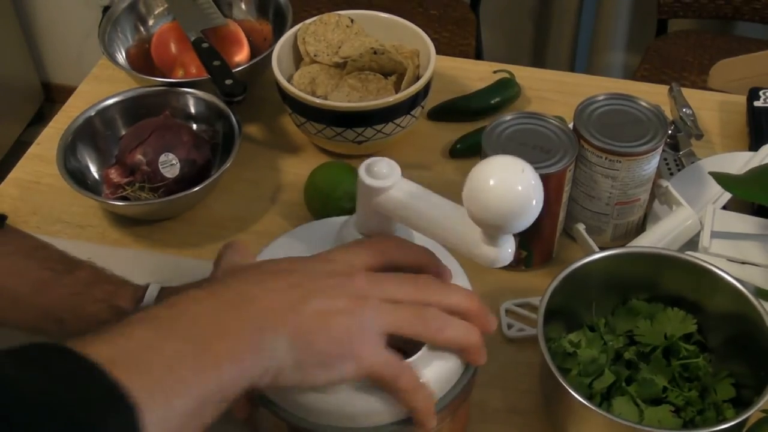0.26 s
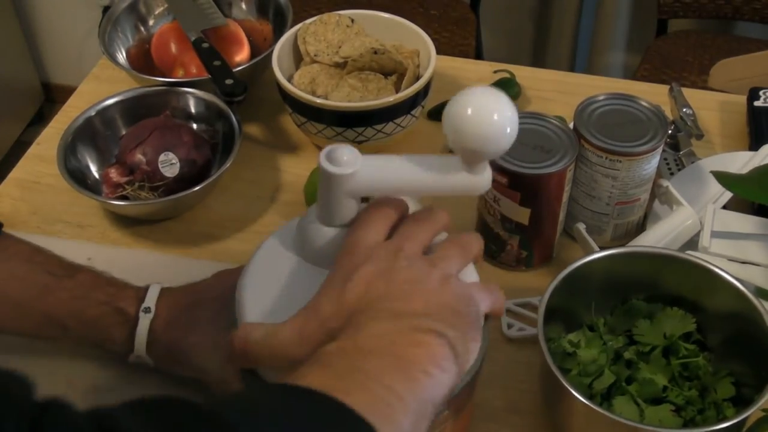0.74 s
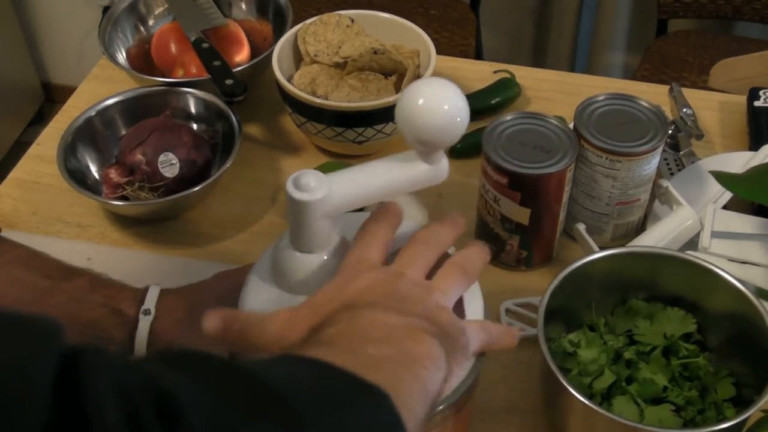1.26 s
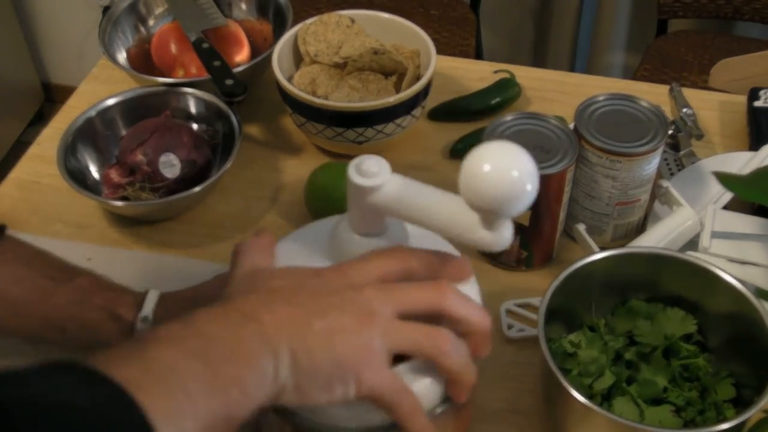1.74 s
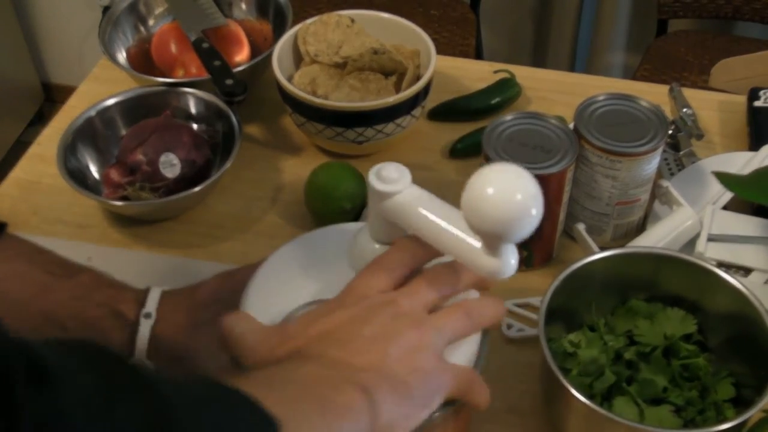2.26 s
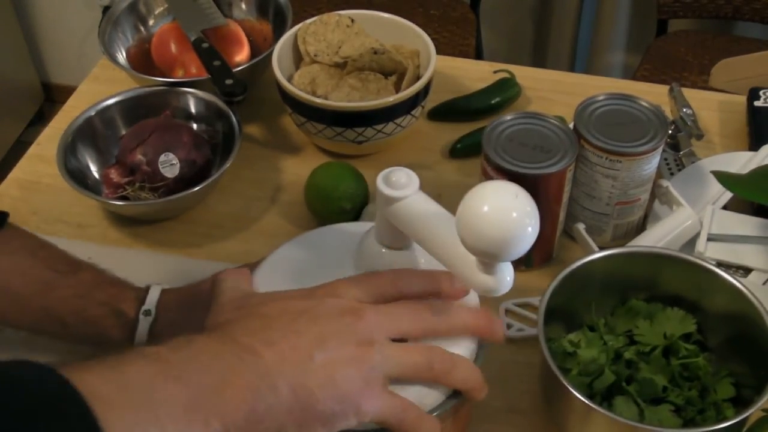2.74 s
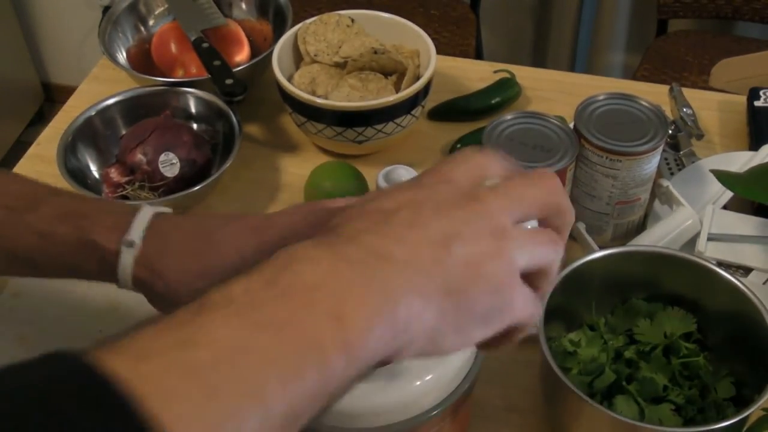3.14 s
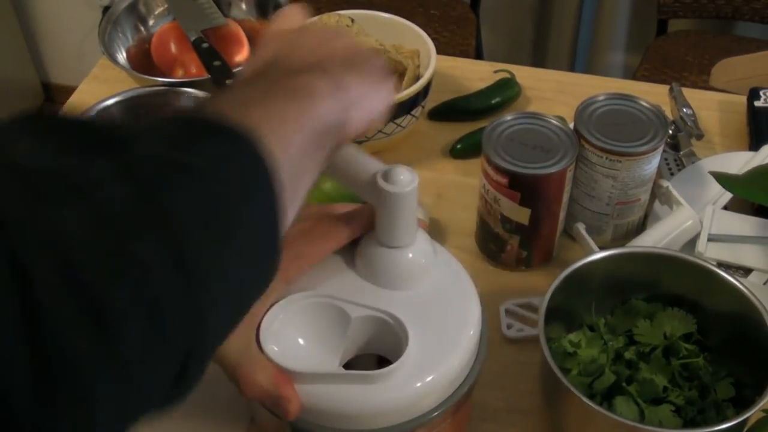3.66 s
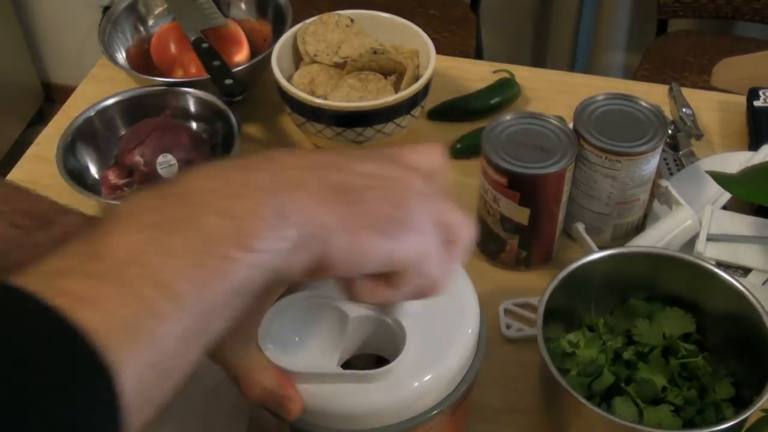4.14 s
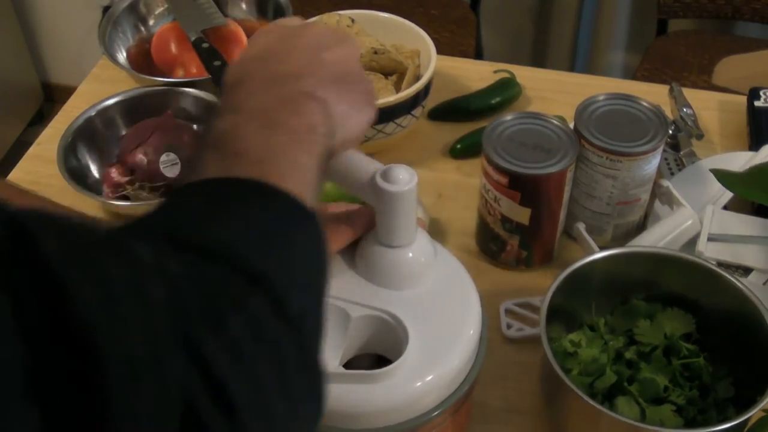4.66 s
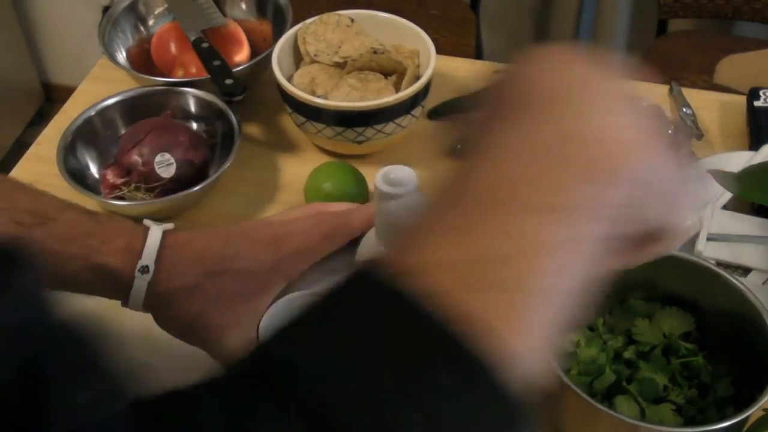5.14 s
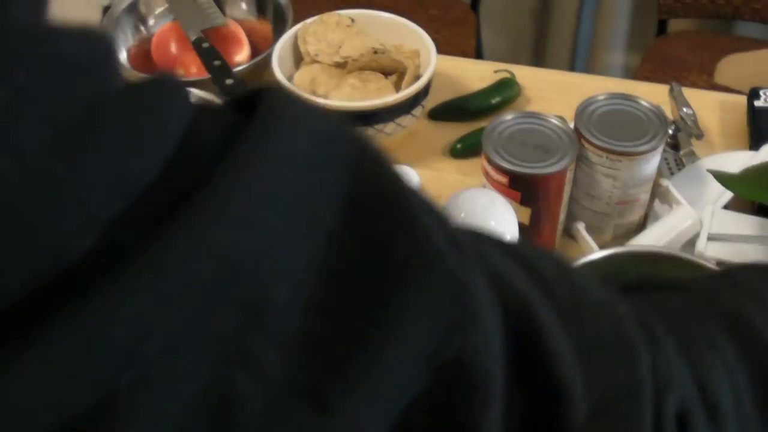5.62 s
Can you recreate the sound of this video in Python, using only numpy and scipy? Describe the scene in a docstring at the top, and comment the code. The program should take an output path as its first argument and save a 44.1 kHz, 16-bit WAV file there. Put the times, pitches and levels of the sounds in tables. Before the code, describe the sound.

Hollow plastic clacks and rubbing as a lid is forced onto a food chopper, followed by dull, uneven crank grinding in a small kitchen.

```python
"""A hand presses and twists the lid of a plastic food chopper until it snaps on: knocks ring lid, bowl
and small stiff parts, and rubbing rings them through many tiny catches, with hiss and a few squeaks.
Then the hand turns the crank: gears and blade grind, and the blade catches and jolts in soft thumps.
Faint echoes of a small kitchen follow every sound of the chopper, over steady quiet air noise."""
import sys
import numpy as np
from scipy import signal
from scipy.fft import rfft, irfft, next_fast_len
from scipy.io import wavfile
from scipy.ndimage import uniform_filter1d

SR = 44100
rng = np.random.default_rng(int(sys.argv[2]) if len(sys.argv) > 2 else 0)


def dump_mix(stems):
    """Bounce the given channels to the path in sys.argv[1] as a 16-bit WAV at rate SR."""
    frames = np.atleast_2d(stems).T  # one column per channel
    limited = np.clip(frames, -1, 1)  # hard clip at full scale
    pcm = np.round(limited * 32767).astype(np.int16)
    wavfile.write(sys.argv[1], SR, pcm)


N = 259749
LEAD_S = 0.005  # a blow starts this long before its peak

# Modes of the hollow bowl, before detuning and damping.
# Each row: frequency in Hz, relative level in dB, 60 dB decay time in seconds.
BOWL_MODES = [(213.7, -29, 0.13), (296, -39.5, .1), (371.6, -2, 0.26), (419.6, 2.5, 0.16), (473, 2, 0.11),
              (508.1, -3.5, 0.26), (553.4, 4, 0.088), (632, 0.5, 0.12)]
# Modes of the thin lid, before detuning and damping.
# Each row: frequency in Hz, relative level in dB, 60 dB decay time in seconds.
LID_MODES = [(839, 7, 0.032), (927, 6.5, 0.016), (1070, -1, 0.096), (1260, 7, 0.039), (1490, -0.5, 0.068),
             (1646, -0.5, 0.029), (1795, -11, 0.042), (2095, -14.5, 0.11)]
# Modes of small stiff parts, before detuning and damping.
# Each row: frequency in Hz, relative level in dB, 60 dB decay time in seconds.
RIM_MODES = [(2983, -2.5, .04), (3656, -6.5, 0.052), (4713, -1.5, 0.061), (5037, 3.5, 0.017),
             (5650, -13, 0.076)]


def knock(lid_db, bowl_db, crack_db, snap_db, lid_hz, bowl_hz, contact_ms, rise_ms, damp):
    """Impact excitation: a brief contact force, convolved with modal responses, plus a noisy crack and snap."""
    # Spectrum of the crack. Each row: frequency in Hz, relative density in dB per Hz.
    crack_spectrum = [(880, -17), (1500, 1.5), (2220, -1), (2420, -8), (3210, -4.5), (3540, -6),
                      (5280, -10), (5670, -12), (6990, -24), (13800, -26.5), (16400, -44.5)]
    t = np.arange(6144) / SR - LEAD_S
    contact_ms = max(contact_ms, 0.3)
    force = np.exp(np.minimum(t / 0.00011, -t * 1000 / contact_ms))
    # a sharp first contact and a short rattle
    rattle = rng.standard_normal(len(t)) * (force + 2.7 * np.exp(-abs(t) / 0.00022))
    # the wall yields at its own pace
    yielding = np.exp(1000 * np.minimum(t / max(rise_ms, 0.05), -t / contact_ms))
    push = np.cos(2 * np.pi * bowl_hz * t) * yielding

    lid_response = ring(LID_MODES, lid_hz, spread=0.25, detune=0.061, damp=0.58)
    lid = signal.fftconvolve(rattle, lid_response)[:len(t)]
    # the lid's ring is kept out of the bass
    lid = signal.sosfilt(signal.butter(2, 500.0, "high", fs=SR, output="sos"), lid)
    bowl_response = ring(BOWL_MODES, bowl_hz, spread=0.2, detune=0.023, damp=damp)
    bowl = signal.fftconvolve(push, bowl_response)[:len(t)]
    rim = signal.fftconvolve(rattle, ring(RIM_MODES, 4530.0, detune=0.046))[:len(t)]

    noise = pair(crack_spectrum, len(t))
    dull = signal.sosfiltfilt(signal.butter(4, 6800.0, fs=SR, output="sos"), noise)
    shiver = 0.23 * np.exp(-abs(t) / 0.021) * (t > 0)  # loose parts shiver on
    crack = dull * (force + shiver) + 1.36 * rim / abs(rim).max()
    snap = evened(noise - dull) * (force + 0.027 * np.exp(-abs(t) / 0.006) * (t > 0))
    rings = amp(lid_db) * lid / abs(lid).max() + amp(bowl_db + 1.5) * bowl / abs(bowl).max()
    return rings + amp(crack_db + 5.5) * crack + amp(snap_db - 0.5) * snap


def lid_knocks(mix):
    """Impacts of hand and lid on the bowl; damping by the grip shortens the bowl's modal decay."""
    # Each row: peak time in seconds, lid ring, bowl thump and crack in dB, snap in dB against the crack,
    # lid and bowl emphasis in Hz; levels are before the layer trims in knock().
    knocks = [(0.054, -15, -21, -33.5, -23, 1060, 390), (0.219, -10, -14.5, -21.5, -10, 1300, 429),
              (0.315, -24, -38.5, -41, -7, 1260, 396), (0.436, -40, -35.5, -47.5, 1, 834, 514),
              (0.781, -16.5, -21.5, -38.5, -23, 746, 522), (0.812, -25.5, -24.5, -42.5, -17.5, 805, 557),
              (0.834, -2.5, -26.5, -33, -10.5, 1540, 550), (0.838, -2.5, -16.5, -50, 0, 1270, 382),
              (0.862, -25.5, -16, -28.5, -6, 1430, 540), (0.912, -6, -5, -17.5, -5, 1260, 500),
              (0.982, -21.5, -5, -22, -2, 1433, 520), (1.263, -19.5, -12, -27, 3.5, 970, 461),
              (1.467, -38, -26.5, -41, -7.5, 2160, 395), (1.48, -12, -17.5, -55, 0.5, 1070, 375),
              (1.493, -11, -29, -28, -22.5, 1120, 352), (1.715, -6, -8.5, -17, -2, 1490, 432),
              (1.749, -16.5, -14.5, -63, 3, 1490, 516), (1.795, -33, -24, -36, -0.5, 1700, 480),
              (1.823, -20.5, -35, -34.5, -10, 1510, 550), (1.836, -34, -48, -28.5, -16.5, 1190, 354),
              (1.955, -17.5, -19.5, -34, -14, 880, 473), (1.98, -8.5, -11, -20, -4.5, 1080, 418),
              (2.026, -23, -10.5, -26, -19, 1170, 387), (2.301, -24.5, -25, -37, -6.5, 1280, 380),
              (2.751, -34.5, -46.5, -47, 6.5, 894, 405), (2.883, -51, -42.5, -46, 6.5, 1640, 380),
              (3.083, -22.5, -47, -37.5, -24, 1710, 356), (3.098, -21, -28, -63, 9, 1180, 443),
              (3.146, -46, -36, -54, -22, 1180, 368), (5.404, -42, -37.5, -63, -7, 1490, 443)]
    for s, lid_db, bowl_db, crack_db, snap_db, lid_hz, bowl_hz in knocks:
        blow = knock(lid_db, bowl_db, crack_db, crack_db + snap_db, lid_hz, bowl_hz,
                     contact_ms=3.3, rise_ms=0.36, damp=0.65)
        add(mix, s - LEAD_S, blow)


def crank_jolts(mix):
    """Impacts of the catching blade: a slow rise of force favours the low modes."""
    # Each row: peak time in seconds, bowl thump and crack in dB, before the layer trims in knock().
    jolts = [(3.29, -26, -55), (3.335, -25, -52), (3.356, -36, -61), (3.442, -35, -38.5), (3.585, -20, -62),
             (3.648, -17.5, -54), (3.66, -24, -42), (3.702, -20.5, -44), (3.741, -21.5, -61),
             (3.801, -28.5, -40), (3.838, -23, -54), (4.025, -22.5, -44), (4.102, -25.5, -46),
             (4.293, -30.5, -62), (4.371, -39, -40), (4.389, -24.5, -47), (4.436, -33, -58),
             (4.503, -34.5, -46.5), (4.563, -33, -44), (4.649, -28.5, -57), (4.678, -20, -52),
             (4.715, -21.5, -52), (4.757, -24.5, -45), (4.857, -25, -61), (4.946, -22.5, -49),
             (4.982, -48, -42), (5.0, -26, -50), (5.074, -33, -48.5), (5.11, -35.5, -66)]
    for s, bowl_db, crack_db in jolts:
        blow = knock(bowl_db - 6.5, bowl_db, crack_db, crack_db + 1.5, lid_hz=1440, bowl_hz=380,
                     contact_ms=3.8, rise_ms=3.6, damp=0.52)
        add(mix, s - LEAD_S, blow)


def rubbing():
    """Stick-slip friction: random catches excite the modes, while sliding surfaces hiss and the counter murmurs."""
    # A loose lid raises the hollow note. Each row: time in seconds, looseness from 0 to 1.
    looseness = [(0, 0.5), (.4, 0.3), (.76, 1), (1.15, 1), (1.35, 0.83), (1.5, 0.45), (1.75, 0.1),
                 (1.8, .6), (2.0, 0.23), (3.2, 0.21), (5.89, 0.28)]
    # Spectrum of the sliding noise. Each row: frequency in Hz, relative density in dB per Hz.
    hiss_spectrum = [(880, -16), (1500, -6), (2400, -9), (3840, -10), (4830, -13), (6140, -13.5),
                     (7350, -26.5), (10200, -25.5), (13700, -28.5), (15400, -28.5), (16400, -36.5)]
    # Spectrum of the counter under the bowl. Each row: frequency in Hz, relative density in dB per Hz.
    thud_spectrum = [(20, -31.5), (60, -15), (120, -22.5), (170, -2), (205, 7.5), (260, -21), (400, -45.5)]
    # Faint hum in the counter. Each row: time in seconds, level in dB.
    murmur = [(0, -69), (2.35, -61), (2.6, -65), (2.95, -73.5), (3.6, -51), (5.1, -62.5), (5.5, -85)]
    bowl_db, lid_db, hiss_db, sizzle_db = contact()
    loose = np.clip(follow(looseness)[0], 0, 1)
    clumps = amp(1.8 * wander(500))

    lid_catches = slips(per_s=1500.0, spread_db=1.0, clumps=clumps)
    bowl_catches = slips(per_s=600.0, spread_db=2.5, clumps=clumps)
    grit = slips(per_s=900.0, spread_db=4.5, clumps=clumps)
    shut, ajar = (rung(bowl_catches, BOWL_MODES, centre_hz=hz, spread=0.38, detune=0.035, damp=1.0)
                  for hz in (370.0, 520.0))
    bowl = np.sqrt(1 - loose) * shut + np.sqrt(loose) * ajar
    lid = rung(lid_catches, LID_MODES, centre_hz=1600.0, spread=1.5, detune=0.06)
    crunch = rung(grit, RIM_MODES, count=8, centre_hz=4500.0, detune=0.091)

    # the hiss swells with the clumps and flickers with the catches
    fading = np.exp(-np.arange(900) / SR / 0.0072)
    flicker = evened(signal.fftconvolve(abs(lid_catches), fading)[:N])
    noise = evened(steady(hiss_spectrum) * (0.23 + 0.7 * clumps + 0.13 * flicker))
    dull = signal.sosfiltfilt(signal.butter(4, 6900.0, fs=SR, output="sos"), noise)
    patches = amp(2.1 * wander(700))  # the sizzle of the rubbing comes in random patches
    sizzle = evened(patches * (noise - dull))
    hiss = amp(hiss_db) * (dull + 0.55 * crunch) + amp(sizzle_db + 1.5) * sizzle

    # the counter follows the bowl and adds its own hum
    thud_gain = amp(0.57 * bowl_db - 39.0) + amp(follow(murmur)[0])
    return amp(bowl_db - 6.0) * bowl + amp(lid_db - 3.0) * lid + hiss + thud_gain * steady(thud_spectrum)


def contact():
    """Powers of independent contacts add: strokes press, hold and let go; the crank follows its load.

    Returns levels in dB of bowl, lid, hiss and sizzle, before the layer trims in rubbing()."""
    # Pushes and twists of the lid. Each row: time of full pressure in seconds, hold in seconds,
    # pressure in dB, then lid, hiss and sizzle in dB against it.
    strokes = [(0.0, 0.059, -26, -11.5, -17, -25), (0.223, .02, -30.5, -5.5, -5, -16),
               (0.278, .05, -30, -8.5, -9.5, -19), (0.44, .01, -34.5, -11, -15, -22),
               (0.488, .04, -38, -11, -10, -17), (.56, .03, -45, -10, -10.5, -14.5),
               (0.659, 0.033, -38.5, -5, -10.5, -22), (0.802, 0.14, -25.5, 0.5, -14.5, -31),
               (0.909, 0.028, -8.5, -11, -22, -31.5), (0.989, 0.023, -17.5, -14.5, -17, -30.5),
               (1.26, .03, -24.5, -26, -16.5, -19.5), (1.358, 0.032, -34, -11.5, -12.5, -21),
               (1.475, 0.064, -27.5, -6.5, -14, -23.5), (1.54, .01, -35.5, -0.5, -12, -14),
               (1.61, 0.011, -32.5, -20, -15, -23), (1.714, 0.005, -18.5, -5, -8.5, -18),
               (1.829, 0.034, -26.5, 1.5, -8.5, -26.5), (1.968, 0.053, -20, -4, -13.5, -24),
               (2.13, 0.0067, -37, -2.5, -6, -14.5), (2.202, 0.025, -40, -4.5, -4.5, -14),
               (2.268, 0.059, -35.5, -10, -13, -19.5), (2.438, 0.0043, -50, 0.5, -6, -12),
               (2.542, .01, -53.5, 1.5, -1.5, -18), (2.642, 0.03, -54.5, 2, 0.5, -4),
               (2.75, 0.026, -53.5, -1, -0.5, -2), (2.829, 0.038, -45, -4, -6.5, -8.5),
               (2.93, 0.014, -46, -10, -11.5, -15), (3.077, .04, -36, -2.5, -14, -28),
               (3.148, .03, -37.5, -4, -15.5, -33), (3.21, 0.028, -48.5, -11, -12, -20),
               (5.328, 0.088, -52.5, -5.5, -8, -10), (5.42, 0.014, -48, -3, -9.5, -21)]
    # Load on the crank. Each row: time in seconds, grind in dB, then lid, hiss and sizzle in dB against it.
    crank = [(3.25, -36, -1, -12.5, -18.5), (3.33, -32.5, -6, -14, -18), (3.45, -38.5, 0.5, -8.5, -11),
             (3.6, -24, -12, -19, -24), (3.63, -37, -5, -7, -17), (3.65, -21, -11, -16.5, -25.5),
             (3.8, -33.5, -4, -12, -20.5), (3.84, -24, -7.5, -18, -22.5), (3.9, -38.5, -4, -9, -16),
             (4.05, -29.5, -5, -17.5, -23), (4.27, -48, -8.5, -8.5, -15), (4.3, -37, -16, -16, -23),
             (4.37, -46.5, 7.5, 1.5, -5), (4.39, -25, -9, -13.5, -17), (4.44, -38, -10.5, -17, -23.5),
             (4.61, -41.5, 0, -10.5, -14), (4.68, -26.5, -3, -15, -24), (4.84, -36, -4, -12, -19.5),
             (4.96, -30.5, -6, -16, -28), (4.98, -39, 0, -2.5, -18), (5.01, -28.5, -15, -19, -28),
             (5.03, -45.5, -6, -11, -15), (5.11, -37.5, -9.5, -20, -30), (5.27, -78, -5, 7, 7)]
    # Release rate in dB per second, one row each for bowl, lid, hiss and sizzle.
    release_db_per_s = np.c_[[200, 230, 240, 300]]
    press_db_per_s = 595.5  # also fades the crank in and out
    t = np.arange(0, N, 64) / SR
    s, *load = np.transpose(crank)
    grind_db, *layers_db = (np.interp(t, s, c) for c in load)
    idle_db = press_db_per_s * np.maximum(np.maximum(s[0] - t, t - s[-1]), 0)
    power = amp(grind_db - idle_db + np.array([0 * t, *layers_db])) ** 2
    for full, held, db, *against_db in strokes:
        press_db = press_db_per_s * np.maximum(full - t, 0)
        release_db = release_db_per_s * np.maximum(t - full - held, 0)
        power = power + amp(db - press_db - release_db + np.c_[[0, *against_db]]) ** 2
    return follow(np.column_stack([t, *(10 * np.log10(power + 1e-12))]))


def slips(per_s, spread_db, clumps):
    """Random point process: tiny catches of random sign, scaled in clumps; a few are large."""
    size = amp(spread_db * np.minimum(rng.exponential(1, N), 4)) * rng.choice([-1, 1], N)
    return size * clumps * (rng.random(N) < per_s / SR)


def rung(catches, modes, count=5, **shape):
    """Modal excitation at several spots, each with its own tuning of the modes."""
    spot = rng.integers(0, count, N)
    return evened(sum(signal.fftconvolve(catches * (spot == k), ring(modes, **shape))[:N]
                      for k in range(count)))


def ring(modes, centre_hz=500.0, spread=12.0, detune=0.03, damp=0.75, size=6144):
    """Modal impulse response: decaying sines, detuned by the grip; those near centre_hz ring most."""
    hz, db, t60 = np.transpose(modes)[:, :, None]
    shift = rng.standard_normal((len(modes), 1))
    t = np.arange(size) / SR
    near_db = -6 * (np.log2(hz / centre_hz) / spread) ** 2  # spread in octaves
    decay = amp(db + near_db - 60 * t / (damp * t60))
    return (decay * np.sin(2 * np.pi * hz * (1 + detune * shift) * t)).sum(0)


def squeak(db, hz, ms):
    """Friction feeding a resonance: a stutter of skin or plastic on plastic drives one narrow ring."""
    t = np.arange(6000) / SR
    stutter = rng.standard_normal(len(t)) * np.minimum(t / 0.002, 1) * np.exp(-t * 1000 / ms)
    modes = [(hz, 0, 0.05), (hz * 1.09, -10, 0.015)]
    tone = signal.fftconvolve(stutter, ring(modes, hz, detune=0))[:len(t)]
    return amp(db) * tone / abs(tone).max()


def kitchen(x):
    """Reverberation: sparse echoes of random sign decay exponentially, each band at its own rate."""
    # Each row: frequency in Hz, 60 dB decay time in seconds.
    decay_times = [(200, 0.32), (1000, 0.56), (4000, 0.47), (12000, 0.24)]
    taps = np.zeros((2, SR // 2))
    at = np.arange(200, SR // 2 - 20, 20) + rng.integers(0, 20, (2, (SR // 2 - 201) // 20))
    np.put_along_axis(taps, at, rng.choice([-1.0, 1.0], at.shape), 1)
    taps[1] = 0.7 * taps[0] + 0.66 * taps[1]  # the two microphones sit close together
    hz, t, z = signal.stft(taps, SR, nperseg=256)
    fading = amp(-60 * t / read(decay_times, hz)[:, None])
    tail = signal.istft(z * fading, SR, nperseg=256)[1]
    return signal.fftconvolve(x, tail / np.linalg.norm(tail[0]), axes=1)[:, :N]


def room_air():
    """Stationary coloured noise: the steady air of the room."""
    # Each row: frequency in Hz, relative density in dB per Hz.
    air_spectrum = [(12, -54), (20, -17), (102, -2), (243, -27.5), (370, 0), (613, -12.5), (1590, -18.5),
                    (2290, -13.5), (2640, -15), (14600, -21), (16400, -21.5)]
    return amp(-57) * steady(air_spectrum)


def pair(spectrum, size):
    """Partial coherence: two channels of coloured noise, alike in the bass and less alike in the treble."""
    # Each row: frequency in Hz, left-right likeness from 0 to 1.
    likeness = [(60, 0.89), (180, 0.69), (550, 1), (1650, 0.88), (4970, 0.41), (15000, 0.11)]
    hz = np.fft.rfftfreq(size, 1 / SR)
    same = np.clip(read(likeness, hz), 0, 1)
    a, b = rfft(rng.standard_normal((2, size)))
    z = np.array([a, same * a + np.sqrt(1 - same ** 2) * b])
    return evened(irfft(z * amp(read(spectrum, hz)), size))


def steady(spectrum):
    """Stationary noise pair over the whole scene, made at a fast transform length."""
    return pair(spectrum, next_fast_len(N))[:, :N]


def wander(width):
    """Low-pass random process: noise averaged twice over width samples, at rms 1."""
    once = uniform_filter1d(rng.standard_normal(N), width)
    return evened(uniform_filter1d(once, width))


def follow(rows):
    """Linear interpolation: columns of a curve table, one value a sample."""
    s, *columns = np.transpose(rows)
    return [np.interp(np.arange(N) / SR, s, c) for c in columns]


def read(points, hz):
    """Interpolation of a spectrum on a logarithmic frequency axis."""
    f, value = np.transpose(points)
    return np.interp(np.log(hz + 1), np.log(f + 1), value)


def amp(db):
    """Decibel law: level to amplitude gain."""
    return 10 ** (np.asarray(db) / 20)


def evened(x):
    """Normalisation to rms 1."""
    return x / np.sqrt(np.mean(x ** 2) + 1e-20)


def add(mix, s, sound):
    """Superposition: adds a sound to the mix from time s in seconds."""
    part = mix[..., round(s * SR):][..., :sound.shape[-1]]
    part += sound[..., :part.shape[-1]]


def scene():
    """Superposition of the chopper, a little to the right, its echoes and the room air."""
    # Short squeaks. Each row: start in seconds, peak level in dB, pitch in Hz, stutter decay constant in ms.
    squeaks = [(0.649, -37, 1500, 30), (2.43, -45, 1600, 37), (2.533, -42, 1653, 22),
               (2.634, -40, 1654, 25), (3.145, -41, 2900, 12), (4.368, -37, 4600, 10),
               (4.98, -37.5, 4700, 12), (5.403, -44, 1510, 26)]
    chopper = rubbing()
    lid_knocks(chopper)
    crank_jolts(chopper)
    for s, db, hz, ms in squeaks:
        add(chopper, s, squeak(db, hz, ms))
    # the chopper's sound thins out below about 165 Hz
    chopper = signal.sosfilt(signal.butter(3, 165.0, "high", fs=SR, output="sos"), chopper)
    wet = chopper + amp(-15) * kitchen(chopper)
    return wet * amp([[-1.1], [0.9]]) + room_air() * amp([[-0.6], [0.6]])  # left, right in dB


def record(dry):
    """Soft saturation rounds off the loudest snaps; then a low-pass filter limits the band."""
    edge_hz = 16280
    low_pass = signal.firwin(511, edge_hz, window=("kaiser", 9), fs=SR)
    rounded = 1.18 * np.tanh(dry / 1.14)
    return signal.oaconvolve(rounded, low_pass[None], "same")


dry = scene()
out = record(dry)
dump_mix(out)
```